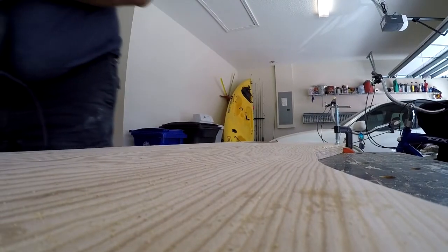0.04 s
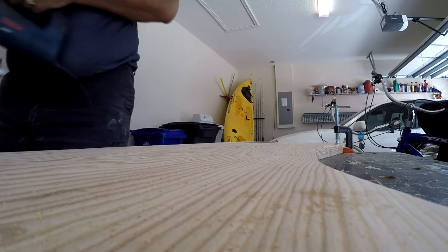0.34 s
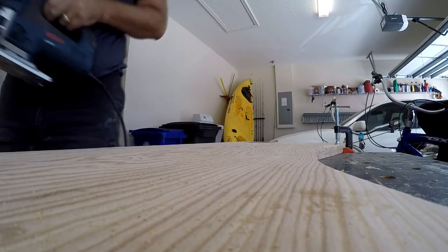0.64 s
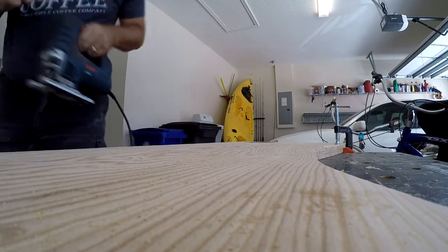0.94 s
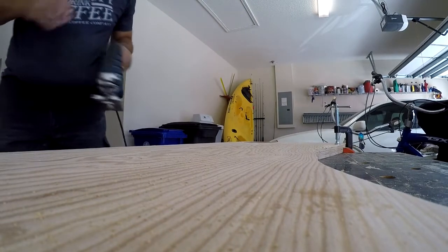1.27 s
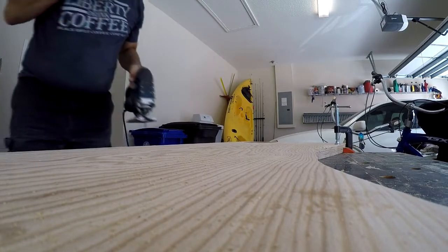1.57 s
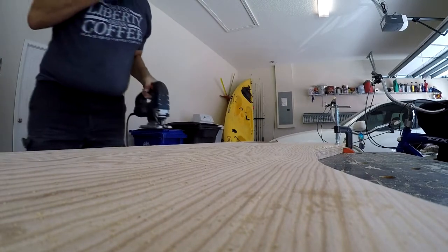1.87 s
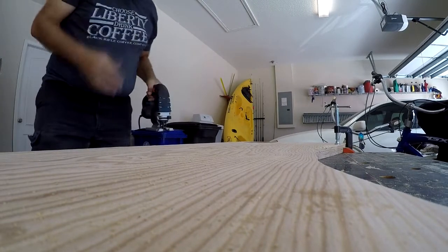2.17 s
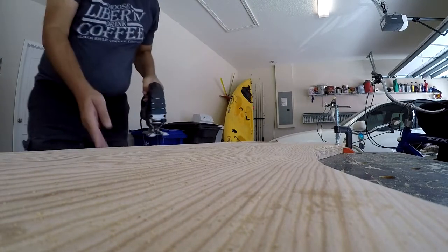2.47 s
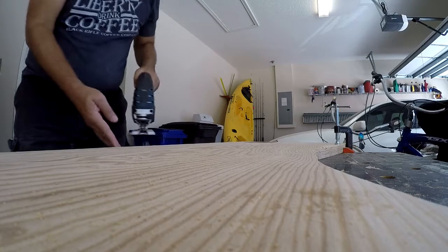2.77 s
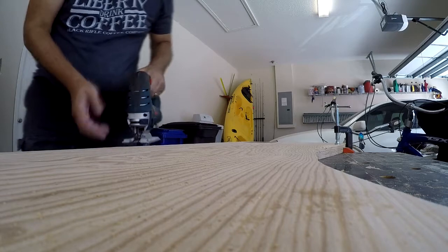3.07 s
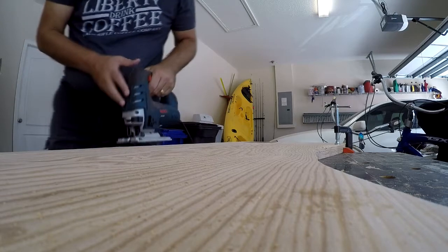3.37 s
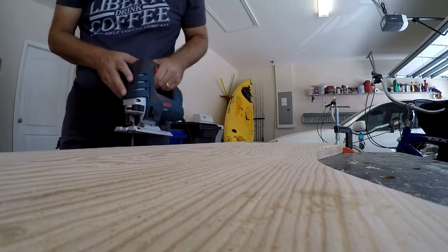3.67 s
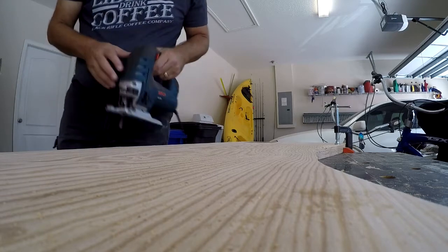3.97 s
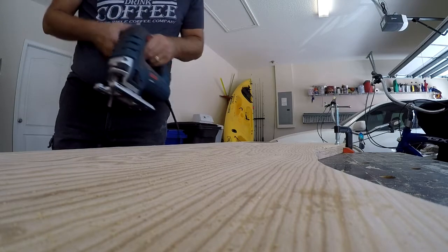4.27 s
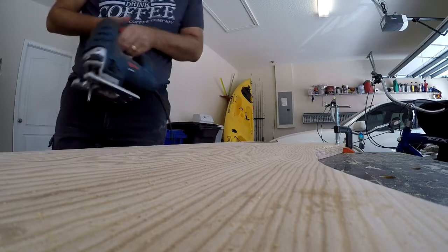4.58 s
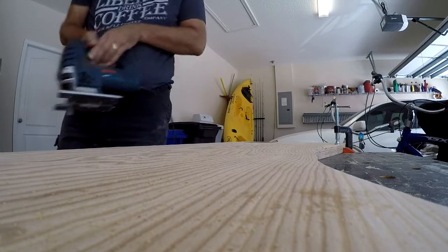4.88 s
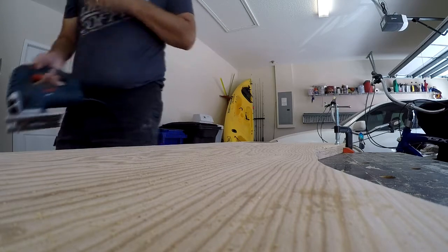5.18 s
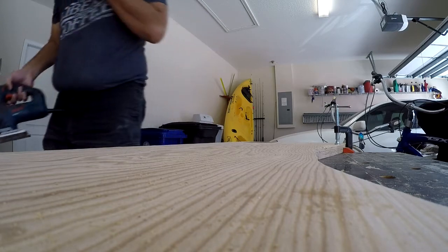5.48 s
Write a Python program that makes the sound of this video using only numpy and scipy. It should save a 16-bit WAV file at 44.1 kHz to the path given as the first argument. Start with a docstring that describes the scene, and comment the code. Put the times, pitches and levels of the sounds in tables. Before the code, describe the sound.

A jigsaw, just switched off, coasts to rest close by in a garage. Its loud, rapid clacking and gear rattle slow and soften while a high whine falls in pitch, ending in a faint squeal and scrape. A distant engine hums over low rumble and a rush of air. The wooden workbench holding the microphone takes one dull bump, and hands brush faintly over the saw's plastic grip.

```python
"""A jigsaw, switched off, coasts to rest in a garage. Friction slows its crank: the plunger clacks at both
ends of each stroke, and the gears rattle and whine ever lower and softer, exciting the casing's modes.
A distant engine hums, takes up a load, hunts and settles, over the room's rumble and rush of air.
The wooden bench that carries the microphone takes one dull bump, and hands brush the saw's grip.
Gain control holds down the saw's first second."""
import sys
import numpy as np
from scipy import signal
from scipy.fft import rfft, irfft, next_fast_len
from scipy.io import wavfile
from scipy.ndimage import uniform_filter1d, map_coordinates

SR = 44100
rng = np.random.default_rng(int(sys.argv[2]) if len(sys.argv) > 2 else 0)


def output_pcm(signal):
    """Save a mono or channel-first signal as 16-bit PCM at the path in sys.argv[1].

    Samples are clipped to [-1, 1] before scaling.
    """
    pcm = np.clip(np.atleast_2d(signal).T, -1, 1) * 32767
    wavfile.write(sys.argv[1], SR, np.round(pcm).astype(np.int16))


N = 248096
TIME_S = np.arange(N) / SR


def amp(db):
    """Decibels to amplitude ratio."""
    return 10 ** (np.asarray(db) / 20)

def unit(x):
    """Normalisation to rms 1."""
    return x / np.sqrt(np.mean(x ** 2) + 1e-20)

def along(points, hz):
    """Interpolation of (frequency_hz, value) points on a log frequency axis."""
    f, v = np.transpose(points)
    return np.interp(np.log(hz + 1), np.log(f + 1), v)

def noise():
    """White noise of rms 1."""
    return rng.standard_normal(N)

def wobble(rate):
    """Smooth random modulation, rate knots a second."""
    return map_coordinates(rng.standard_normal(int(N * rate / SR) + 4), [TIME_S * rate])

def swells(rows):
    """Gaussian envelopes from rows of (centre_s, half_width_s, level_db)."""
    return sum(amp(db) * np.exp(-((TIME_S - centre) / width) ** 2) for centre, width, db in rows)

def onset(start_s, rise_s):
    """A raised-cosine step from 0 to 1."""
    return np.sin(np.pi / 2 * np.clip((TIME_S - start_s) / rise_s, 0, 1)) ** 2

def passing(turns):
    """The times at which a rising count passes whole numbers."""
    return (np.flatnonzero(np.diff(np.floor(turns))) + 1) / SR

def struck(times, sizes, t60):
    """Impacts as noise bursts whose energy decays exponentially."""
    blows = np.bincount(np.clip(times * SR, 0, N - 1).astype(int), sizes ** 2, N)
    retained = amp(-60 / (t60 * SR)) ** 2
    return np.sqrt(signal.lfilter([1], [1, -retained], blows)) * noise()

def coloured(x, spectrum, modes=()):
    """A minimum-phase filter of unit power gain: resonant peaks on a broad spectrum."""
    size = 2 * next_fast_len(N // 2 + SR // 4)
    hz = np.fft.rfftfreq(size, 1 / SR)
    peaks = 1 + sum(amp(db) ** 2 / (1 + (2 * (hz - centre) / width) ** 2) for centre, width, db in modes)
    gain = unit(amp(along(spectrum, hz)) * np.sqrt(peaks))
    cepstrum = irfft(np.log(gain + 1e-6))[:size // 2]
    cepstrum[1:] *= 2
    return irfft(rfft(x, size) * np.exp(rfft(cepstrum, size)))[:N]

def narrow(x, modes):
    """Parallel resonators, each passing one narrow band."""
    return sum(amp(db) * signal.lfilter(*signal.iirpeak(hz, hz / width, SR), x)
               for hz, width, db in modes)

# The garage's reverberation time: frequency_hz, t60_s
GARAGE_DECAY = [(200, 1), (2000, 0.28), (6000, 0.99), (14000, 0.23)]
def garage(x, wet_db):
    """Reverberation: direct sound plus decaying wall reflections, at about the same total power."""
    hz, t, spectra = signal.stft(rng.standard_normal(SR // 2), SR, nperseg=256)
    tail = signal.istft(spectra * amp(-60 * t / along(GARAGE_DECAY, hz)[:, None]), SR, nperseg=256)[1]
    echo = signal.fftconvolve(x, np.pad(tail, (SR // 200, 0)) / np.linalg.norm(tail))[:N]
    return (x + amp(wet_db) * echo) / np.hypot(1, amp(wet_db))

START_HZ, DRAG_S, FRICTION_HZ_PER_S = 31.954, 2.08, 4.8743
START_TURN, TEETH_PER_STROKE = 0.1, 41.1
def crank():
    """Viscous drag and dry friction slow the crank; gives strokes per second and strokes completed."""
    friction_hz = FRICTION_HZ_PER_S * DRAG_S
    speed = np.maximum((START_HZ + friction_hz) * np.exp(-TIME_S / DRAG_S) - friction_hz, 1e-3)
    return speed, np.cumsum(speed) / SR + START_TURN

def by_speed(speed, level_db, doubling_db):
    """A power law: level_db at 20 strokes a second, doubling_db more with each doubling of speed."""
    return amp(level_db + doubling_db * np.log2(speed / 20))

# The clack at the bottom of the stroke: speed_hz, gain_db
BOTTOM_CLACK = [(22, 0.5), (26, -2)]
# The hardest clacks: start_s, relative_level_db
HARD_CLACKS = [(0.307, 1), (.626, -14), (0.6738, 7.5), (0.7228, 3), (0.752, -6), (.830, -2), (.8855, 6.5),
               (1.071, 3.5)]
CLACK_DB, SOFT_BELOW_HZ, SOFTEN_DB_PER_HALVING = 6, 12.6, 8
def plunger(speed, turns):
    """Impact at each reversal of the plunger; slow strokes land softly."""
    hard_times, hard_db = np.transpose(HARD_CLACKS)
    hard = struck(hard_times, amp(hard_db + 3), t60=0.014)
    bottom = amp(np.interp(speed, *np.transpose(BOTTOM_CLACK)))
    clacks = np.zeros(N)
    for offset, gain in ((0, 0.83), (0.5, bottom)):
        times = passing(turns + offset)
        clacks += gain * struck(times, amp(rng.normal(0, 0.42, len(times))), t60=0.02)
    softening_db = SOFTEN_DB_PER_HALVING * np.minimum(np.log2(speed / SOFT_BELOW_HZ), 0)
    return clacks * amp(CLACK_DB + softening_db) + hard

# The swing of the load on the teeth: speed_hz, depth_db
LOAD_SWING = [(5, 0.5), (8.5, 4), (17, -1.7)]
def rattle(speed, turns):
    """Tooth impacts and sliding friction, amplitude-modulated by the load twice a stroke."""
    depth_db = np.interp(speed, *np.transpose(LOAD_SWING))
    load = amp(depth_db * np.cos(4 * np.pi * (turns + 0.12)))
    times = passing(turns * TEETH_PER_STROKE)
    teeth = struck(times, amp(rng.normal(0, 3.8, len(times))), t60=0.0039)
    return load * (amp(-2.5) * teeth + amp(-4) * noise())

# Gear tones, each strongest near one crank speed: harmonic, relative_level_db, speed_hz, width_hz
MESH_TONES = [(1, -4.5, 21.5, 6), (2, -11, 19.5, 5), (3, -9, 22.5, 4), (4, -6.5, 21, 2.8), (5, -6, 24.5, 4),
              (6, -6, 9, 2), (12, -5, 10.5, 2.5)]
def gears(speed, turns):
    """Harmonics of the tooth rate, phase-modulated as the crank hurries and lags and the teeth chatter."""
    mesh_phase = 2 * np.pi * TEETH_PER_STROKE * turns + 0.31 * np.sin(4 * np.pi * turns)
    tones = np.zeros(N)
    for harmonic, db, best_hz, width_hz in MESH_TONES:
        strength = amp(db + 2.5 * wobble(45)) * np.exp(-((speed - best_hz) / width_hz) ** 2)
        tones += strength * np.sin(harmonic * mesh_phase + 1.15 * wobble(170))
    return tones

# The gear cover's metal modes: pitch_hz, width_hz, gain_db
COVER_MODES = [(2842, 22, 0), (3516, 22, -2)]
COVER_SPEED_HZ, COVER_WIDTH_HZ = 18.7, 4.4
def cover(speed, turns):
    """Forced resonance: the rattle keeps two sharp modes ringing, most of all near one crank speed."""
    nearness = np.exp(-((speed - COVER_SPEED_HZ) / COVER_WIDTH_HZ) ** 2)
    return amp(-20 + 11.5 * nearness) * unit(narrow(rattle(speed, turns), COVER_MODES))

# The casing's broad response in three ranges: frequency_hz, relative_gain_db
CASING_LOW = [(150, -35.5), (350, -15.5), (600, -6.5), (800, -3.5), (950, -1), (1350, -0.5), (1620, -2),
              (1900, -7.5), (3000, -66.5), (6000, -108)]
CASING_MID = [(300, -90), (1200, -56), (1850, -6), (2130, 1), (2430, 0), (2800, 2), (3100, -0.5),
              (3700, -0.5), (4050, -6), (4600, -6.5), (5400, -47), (8000, -59)]
CASING_TOP = [(1500, -91), (3500, -39.5), (4800, 1), (5400, 3.5), (6300, 1.5), (7500, -0.5), (8600, -2.5),
              (10200, -4), (11000, -7.5), (12200, -7.5), (15000, -14.5)]
# Its modes in those ranges: pitch_hz, width_hz, relative_gain_db
LOW_MODES = [(864, 30, 0), (995, 68, 0), (1534, 50, 2.9), (1670, 44, 0.28)]
MID_MODES = [(2157, 36, 3.5), (2287, 31, 1.5), (2835, 59, 6.5), (3420, 40, 7), (3520, 31, 2)]
TOP_MODES = [(7400, 350, -2.5), (9760, 500, -2.5)]
# Rubbing added on some slow strokes: centre_s, half_width_s, relative_level_db
HARD_RUBS = [(1.37, .022, -3), (1.47, .025, -4), (1.658, 0.0093, -2), (1.724, 0.011, 0), (1.872, 0.017, -3)]
def saw():
    """Source and filter: the mechanism drives the casing, which swells as falling tones cross modes."""
    speed, turns = crank()
    drive = by_speed(speed, -13.5, doubling_db=10.46)
    clacks = garage(drive * plunger(speed, turns), wet_db=-9)
    whirr = garage(amp(-3.5) * drive * rattle(speed, turns), wet_db=-13.5)
    tones = garage(by_speed(speed, -9, doubling_db=0.5) * drive * gears(speed, turns), wet_db=-4.5)
    low_force = amp(-2) * clacks + amp(0.5) * whirr + amp(-2.5) * tones
    mid_force = clacks + whirr * (1 + swells(HARD_RUBS)) + tones
    top_force = amp(-3) * clacks + amp(1.5) * whirr + amp(1) * tones
    low = coloured(low_force * by_speed(speed, -1.8, doubling_db=2.8), CASING_LOW, LOW_MODES)
    middle = coloured(mid_force, CASING_MID, MID_MODES)
    top = coloured(top_force * by_speed(speed, -9.5, doubling_db=5), CASING_TOP, TOP_MODES)
    return low + middle + top + drive * cover(speed, turns)

# Resonances that the whine falls through: pitch_hz, width_hz, gain_db
WHINE_MODES = [(10100, 570, 7.5), (7750, 510, -2), (6070, 210, -1)]
WHINE_CYCLES_PER_STROKE = 401.5
def whine():
    """A rotational tone: its pitch is proportional to speed, and it flickers and fades as it falls."""
    speed, turns = crank()
    flicker = 1 + np.interp(speed, [15, 27], [0.55, 0.15]) * wobble(70)
    jitter = np.interp(speed, [14, 24], [1.1, 0.1]) * wobble(220)
    phase = 2 * np.pi * WHINE_CYCLES_PER_STROKE * turns + jitter
    tone = by_speed(speed, -38.5, doubling_db=20) * flicker * np.sqrt(2) * np.sin(phase)
    return tone + narrow(tone, WHINE_MODES)

# The engine's low tones: harmonic, relative_level_db
ENGINE_TONES = [(4, -3), (5, 0), (6, 0), (7, -2), (9, -1), (10, -3), (11, -2)]
# A tone's level among the garage's standing waves: frequency_hz, level_db
STANDING_WAVES = [(115, -50.5), (138, -30.5), (143, -31.5), (147, -38), (153, -47.5), (168, -51),
                  (176, -35), (184, -34), (205, -53), (270, -54.5), (310, -44), (337, -39.5)]
# A thin steady tone fading in: time_s, level_db
THIN_FADE = [(2.6, -58), (5.1, -43.5)]
# Swells of the highest low tone: centre_s, half_width_s, level_db
TONE_SWELLS = [(2.97, 0.15, -37.5), (4.4, 0.26, -42), (5.55, 0.15, -44)]
FREE_HZ, LOADED_HZ, THIN_HZ = 30.65, 29.36, 1009
LOAD_START_S, LOAD_RISE_S, LOAD_DB = 2.15, 0.255, 6
HUNT_START_S, HUNT_PERIOD_S, HUNT_DECAY_S, HUNT_DEPTH_HZ = 2.24, 0.61, 1.636, 1.216
def engine():
    """Load slows the engine and its governor hunts, a damped swing; harmonics cross standing waves."""
    load = onset(LOAD_START_S, LOAD_RISE_S)
    since = np.maximum(TIME_S - HUNT_START_S, 0)
    hunting = np.sin(2 * np.pi * since / HUNT_PERIOD_S) * np.exp(-(since / HUNT_DECAY_S) ** 4)
    speed = FREE_HZ + (LOADED_HZ - FREE_HZ) * load - HUNT_DEPTH_HZ * hunting
    angle = 2 * np.pi * np.cumsum(speed) / SR
    tones = [(harmonic * angle, db + along(STANDING_WAVES, harmonic * speed) + LOAD_DB * (load - 1))
             for harmonic, db in ENGINE_TONES]
    thin_phase = 2 * np.pi * THIN_HZ * TIME_S + 0.5 * wobble(4.14)
    tones.append((thin_phase, np.interp(TIME_S, *np.transpose(THIN_FADE))))
    drone = sum(amp(db + wobble(5)) * np.sin(phase + 0.12 * wobble(14)) for phase, db in tones)
    surges = swells(TONE_SWELLS) * np.sin(ENGINE_TONES[-1][0] * angle)
    return np.sqrt(2) * (drone + surges + load * buzz(angle))

# Spectra of the room's rumble and air: frequency_hz, relative_density_db
RUMBLE_SPECTRUM = [(8, -6), (18, -16), (28, -6.5), (42, 6), (57, 9), (72, -7), (95, -0.5), (125, -9),
                   (200, -20), (270, -10), (450, -43), (2000, -100)]
AIR_SPECTRUM = [(60, -24), (200, 4), (300, 5), (400, 0.5), (600, -0.5), (850, 0), (1250, -2), (1600, -3.5),
                (2500, -8), (4000, -11.5), (5400, -15.5), (7000, -19), (10000, -26), (15000, -35)]
# Brief swells of the rumble: centre_s, half_width_s, level_db
RUMBLE_SWELLS = [(2.49, 0.07, -28.5), (3.43, 0.12, -31.5)]
# Bands that sing in the air noise: pitch_hz, width_hz, gain_db
AIR_MODES = [(1136, 35, -5), (1150, 68, -5), (2970, 93, -0.5), (5760, 85, 4), (8480, 210, 1)]
def room():
    """Ambient noise: rumble and a rush of air, with resonances that sing once the engine is loaded."""
    rumble = unit(coloured(noise(), RUMBLE_SPECTRUM, modes=[(62, 8.7, -1.7)]))
    air_db = -34.75 - 0.5 * onset(LOAD_START_S, LOAD_RISE_S)
    air = amp(air_db) * unit(coloured(noise(), AIR_SPECTRUM))
    singing = onset(start_s=2.44, rise_s=0.05) * amp(-32 + 1.4 * wobble(9))
    bands = narrow(singing * unit(coloured(noise(), AIR_SPECTRUM)), AIR_MODES)
    return (amp(-31) + swells(RUMBLE_SWELLS)) * rumble + air + bands

# The gears' squeal and scrape: centre_s, half_width_s, level_db
SQUEALS = [(1.72, 0.087, -41)]
SCRAPES = [(1.88, 0.3, -47.5)]
# The scrape's spectrum: frequency_hz, relative_density_db
SCRAPE_SPECTRUM = [(2500, -40), (3600, -13), (4000, 12), (4400, -11), (6000, -37), (12000, -77)]
def gear_friction():
    """Dry friction in the last turns: a squeal on a harmonic of the tooth rate, then a rough scrape."""
    _, turns = crank()
    squeal = swells(SQUEALS) * np.sin(2 * np.pi * 17 * TEETH_PER_STROKE * turns + 1.4 * wobble(400))
    scrape = swells(SCRAPES) * amp(4.1 * wobble(25.3)) * unit(coloured(noise(), SCRAPE_SPECTRUM))
    return squeal + scrape

def buzz(angle):
    """The loaded engine's faint upper harmonics, each with its own level and slow phase drift."""
    harmonics = range(22, 46)
    levels_db = rng.normal(-61.5, 5.5, len(harmonics))
    return sum(amp(db) * np.sin(k * angle + 2 * wobble(2)) for k, db in zip(harmonics, levels_db))

# The bench's modes: pitch_hz, relative_level_db, t60_s, rise_s
BENCH_MODES = [(30.8, -0.5, 0.46, 0.031), (58, -6.5, 0.29, 0.018), (99.5, 0.5, 0.093, .003),
               (133, -1.5, 0.14, 0.0038), (172, -31, 0.051, .002)]
BUMP_S, BUMP_DB = 3.212, -6
def bench_bump():
    """Damped free vibration after a soft blow: the bench top booms briefly, then sways on its legs."""
    t = np.maximum(TIME_S - BUMP_S, 0)
    boom = sum(amp(db - 60 * t / t60) * (1 - np.exp(-t / rise)) * np.sin(2 * np.pi * hz * t)
               for hz, db, t60, rise in BENCH_MODES)
    puff = noise() * amp(-60 * t / 0.18) * (1 - np.exp(-t / 0.004))
    contact = coloured(puff, spectrum=[(100, -9), (400, -13), (1400, -21), (4000, -38), (14000, -56)])
    return amp(BUMP_DB) * (boom + amp(-14) * contact)

# Brushes as the saw changes hands: centre_s, half_width_s, level_db
BRUSHES = [(4.91, 0.081, -48), (5.15, .05, -45.5)]
def handling():
    """Sliding friction: hands hiss faintly over the plastic grip."""
    return swells(BRUSHES) * coloured(noise(), spectrum=[(500, -16), (3000, 7), (9000, -6), (15000, -10)])

def scene():
    """Superposition of all sources at one microphone on the bench."""
    jigsaw = saw() + garage(whine() + gear_friction(), wet_db=-11)
    return (jigsaw + engine() + room() + bench_bump() + handling())[None]

HOLD_DB, HOLD_WINDOW_S, BAND_LIMIT_HZ = -13.5, 0.145, 15400
def record(dry):
    """Gain control limits the short-term power; peaks clip at full scale, and a low-pass follows."""
    power = np.abs(uniform_filter1d(dry ** 2, int(HOLD_WINDOW_S * SR), axis=1))
    held = dry / (1 + (power / amp(HOLD_DB) ** 2) ** 3) ** (1 / 6)
    size = next_fast_len(N + SR // 4)
    passband = np.fft.rfftfreq(size, 1 / SR) < BAND_LIMIT_HZ
    return irfft(rfft(np.clip(held, -1, 1), size) * passband, size)[:, :N]

dry = scene()
out = record(dry)
output_pcm(out)
```